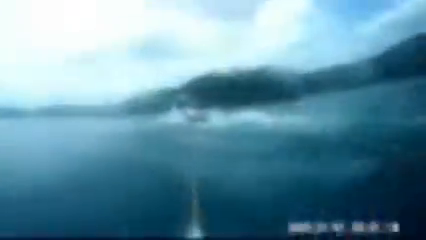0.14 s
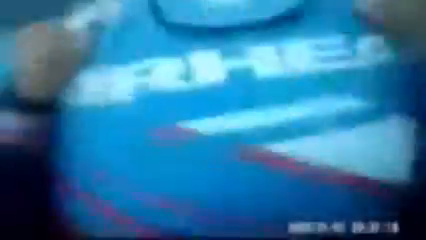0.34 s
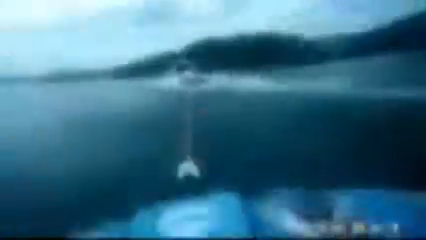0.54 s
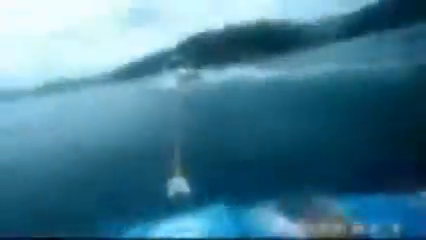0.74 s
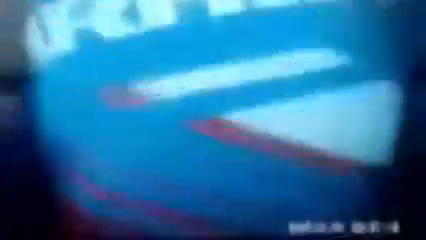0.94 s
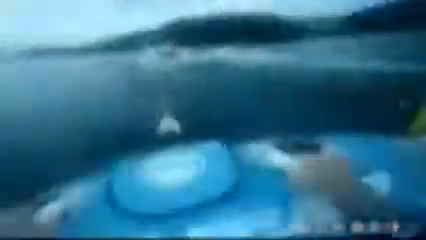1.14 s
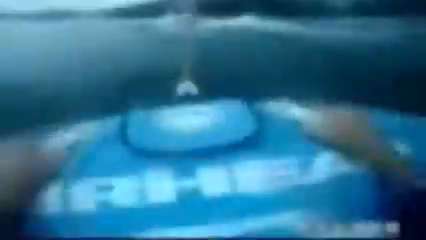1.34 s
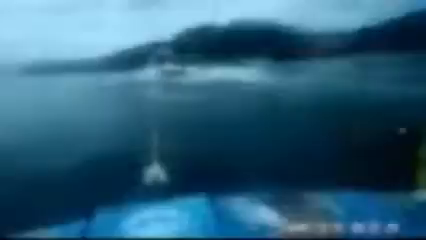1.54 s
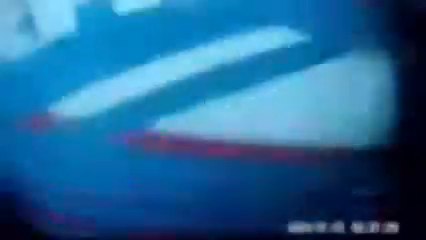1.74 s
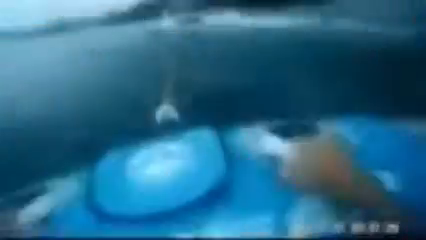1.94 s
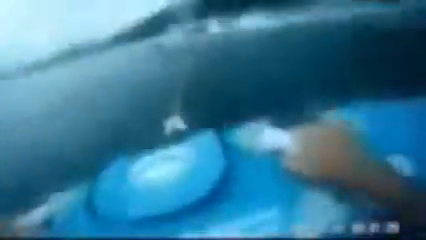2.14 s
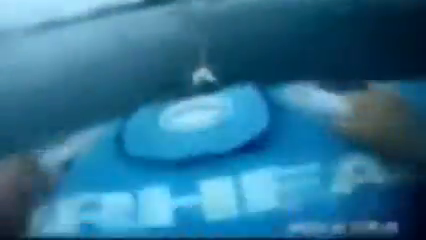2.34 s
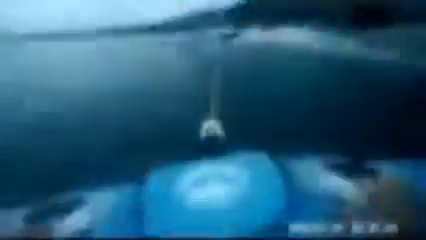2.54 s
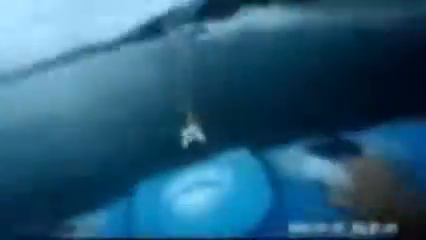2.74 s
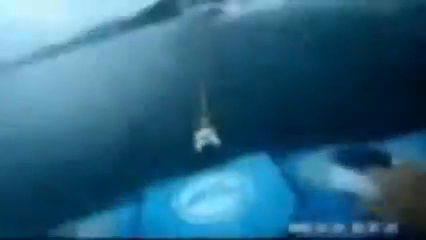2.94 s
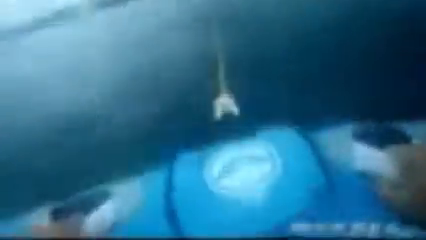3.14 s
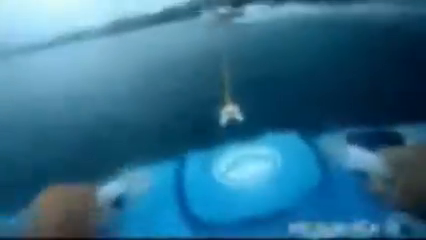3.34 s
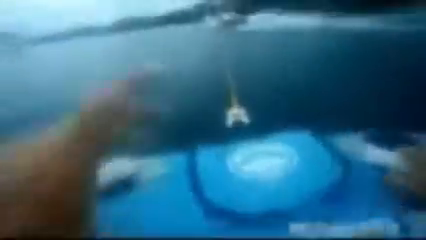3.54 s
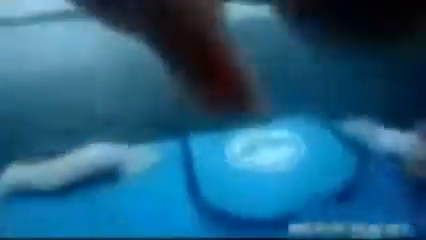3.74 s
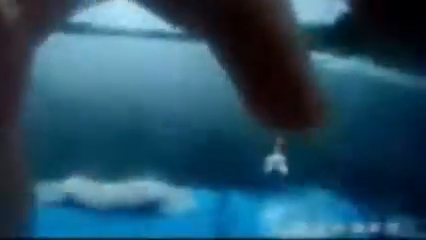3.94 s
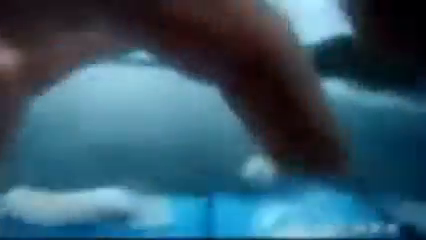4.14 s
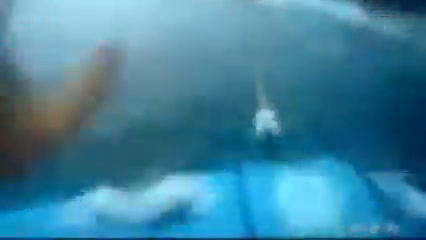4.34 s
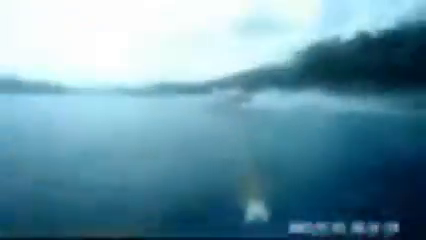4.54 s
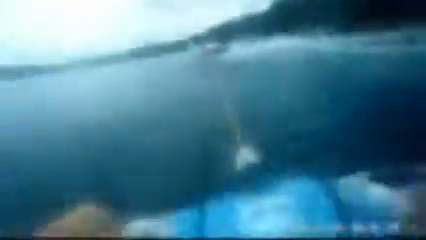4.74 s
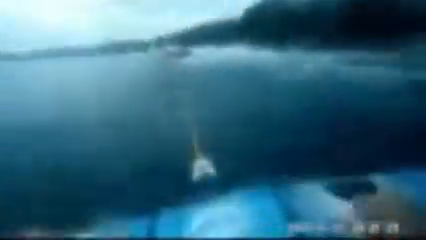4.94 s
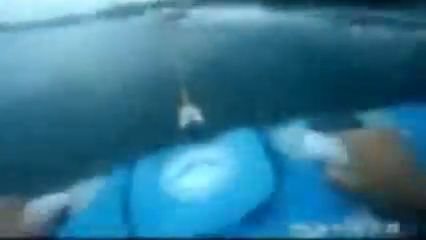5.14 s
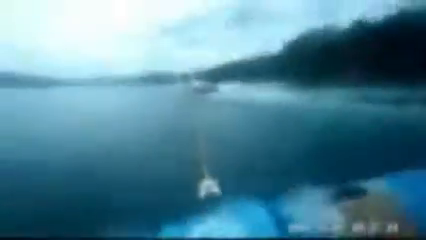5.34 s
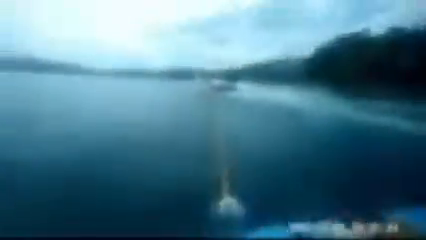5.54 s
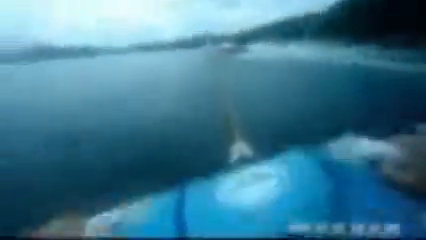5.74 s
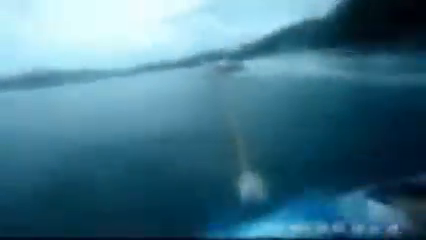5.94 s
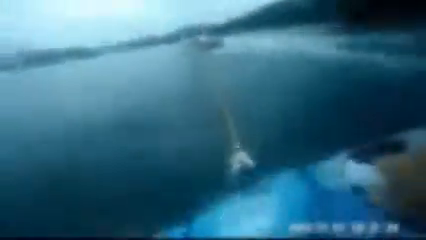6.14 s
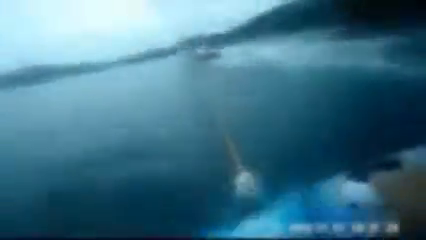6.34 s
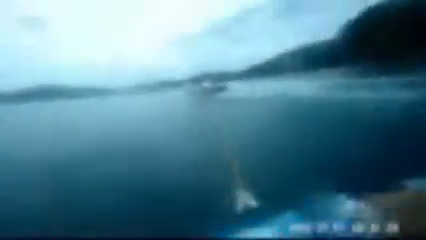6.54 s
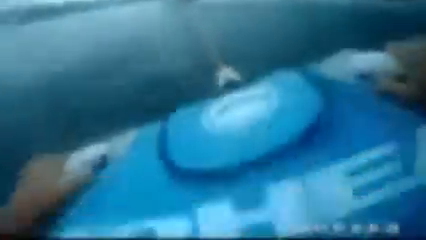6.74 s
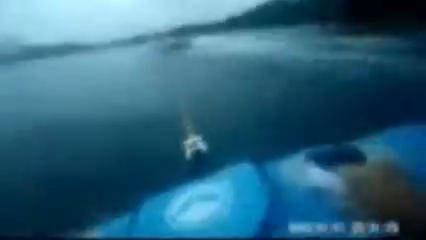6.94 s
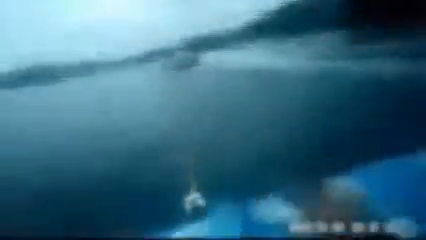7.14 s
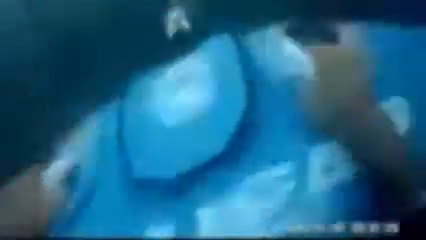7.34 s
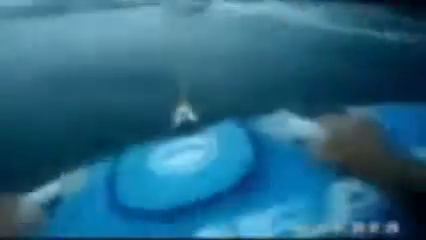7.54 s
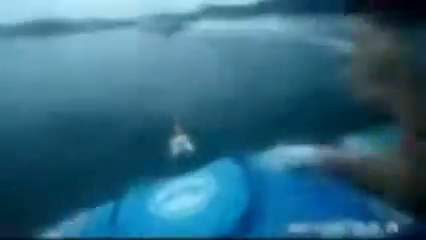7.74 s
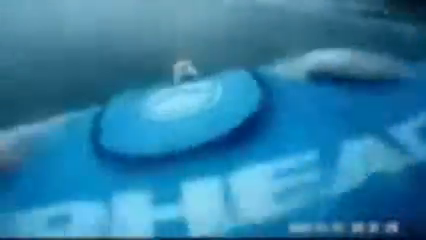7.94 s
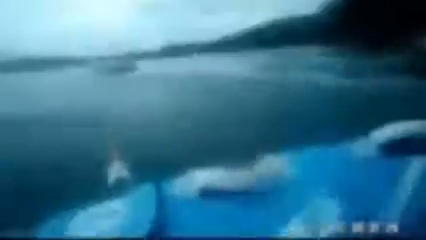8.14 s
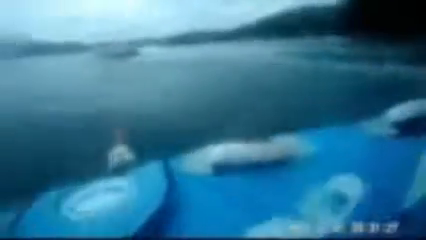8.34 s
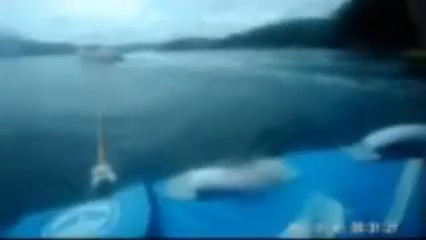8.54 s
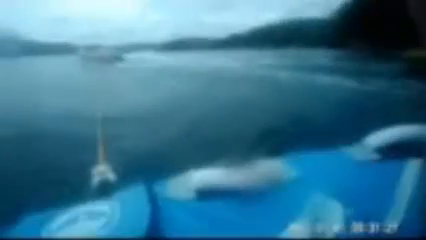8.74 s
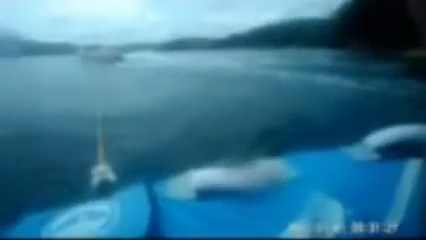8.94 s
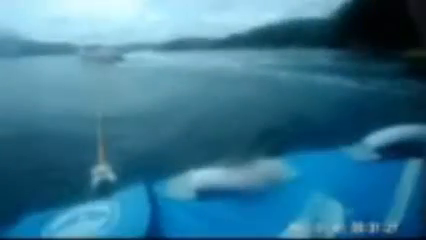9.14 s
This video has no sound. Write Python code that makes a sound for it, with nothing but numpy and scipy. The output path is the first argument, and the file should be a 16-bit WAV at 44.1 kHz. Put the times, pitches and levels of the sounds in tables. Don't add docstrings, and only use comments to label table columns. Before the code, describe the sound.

Inside a plastic housing on a towed tube, violent water blows, clacks and brief squeaks break over a muffled rushing hum, then abruptly stop.

```python
import sys
import numpy as np
from scipy import signal
from scipy.fft import rfft, irfft, next_fast_len
from scipy.io import wavfile
from scipy.ndimage import uniform_filter1d, minimum_filter1d, map_coordinates

SR = 44100
rng = np.random.default_rng(int(sys.argv[2]) if len(sys.argv) > 2 else 0)


def put_to_file(sound):
    columns = np.atleast_2d(sound).T
    safe = np.clip(columns, -1, 1)
    whole_steps = np.round(safe * 32767)
    wavfile.write(sys.argv[1], SR, whole_steps.astype(np.int16))


def makeup_ratio(level_db):
    decades = np.asarray(level_db, float) / 20
    return 10 ** decades


N = 405279


def unit(x):
    return x / np.sqrt(np.mean(x ** 2) + 1e-20)


def peaked(rows):
    return rows / np.abs(rows).max(axis=1, keepdims=True)


def along(points, hz):
    f, db = np.transpose(points)
    return makeup_ratio(np.interp(np.log(hz + 1), np.log(f + 1), db))


def wobble(rate):
    knots = rng.standard_normal(int(N * rate / SR) + 4)
    return map_coordinates(knots, [np.arange(N) * rate / SR])


def filtered(x, response):
    m = next_fast_len(x.shape[-1] + 8192)
    spectrum = rfft(x, m) * response(np.fft.rfftfreq(m, 1 / SR))
    return irfft(spectrum, m)[..., :x.shape[-1]]


def rush(response, patchy_db):
    z = signal.stft(rng.standard_normal(N), nperseg=512)[2]
    patches = uniform_filter1d(rng.standard_normal(z.shape), 6, 0)
    patches = unit(uniform_filter1d(patches, 10, 1))
    noise = signal.istft(z * makeup_ratio(patchy_db * patches), nperseg=512)[1][:N]
    return unit(filtered(noise, response))


def placed(times, rows):
    at = np.round(times * SR).astype(int)[:, None] + np.arange(rows.shape[1])
    return np.bincount(at.ravel(), rows.ravel(), N + SR)[:N]


def sheet_power(table, edge_s):
    t = np.arange(N) / SR
    power = 0
    for s, length, db in table:
        rise, drain = np.tanh((t - s) / edge_s), np.tanh((t - s - length) / edge_s)
        power = power + makeup_ratio(2 * db) * (rise - drain) / 2
    return np.abs(power)


def slams():
    # trough in s, depth in dB, width in ms, push before it (relative).
    waves = [(0.2841, 4.3, 7.2, 0.88), (0.332, 0.3, 8.4, 0.44), (0.7189, -23.7, 5.6, 1.76),
             (0.8573, 5.1, 7.2, 0.69), (0.9033, 2.0, 8.5, 0.51), (1.1076, 2.5, 8.2, 0.39),
             (1.1462, -7.2, 4.6, 0.03), (1.3234, 5.9, 8.7, 0.54), (1.3724, -7.3, 9.8, 0.25),
             (1.5597, -21.8, 7.8, 2.49), (1.6706, 6.4, 8.1, 0.61), (1.7206, -4.4, 8.7, 0.35),
             (2.1084, 1.9, 7.9, 0.2), (2.141, -0.7, 2.1, 0.18), (2.3493, 3.7, 7.8, 0.32),
             (2.3811, -6.7, 3.5, 0.22), (3.4531, -9.1, 5.3, 0.56), (3.4815, -7.0, 9.9, 0.53),
             (3.9825, -17.6, 5.1, 0.13), (4.009, -21.8, 7.3, 2.48), (4.028, -11.3, 6.2, 0.14),
             (4.0711, -11.0, 9.6, 0.01), (4.2037, -11.2, 10.5, 0.24), (5.0385, -8.2, 8.9, 0.26),
             (5.7493, -11.0, 9.6, 0.18), (7.2154, 2.1, 8.1, 0.31), (7.2707, -7.9, 3.7, 0.03),
             (7.7016, -29.3, 10.4, 1.27), (7.7807, -15.8, 6.6, 0.0), (7.9288, -19.6, 4.4, 0.16),
             (7.9519, -12.5, 7.1, 0.54)]
    # trough in s, depth in dB.
    heaves = [(.15, -28), (.547, -22), (.941, -23), (1.225, -24), (2.55, -24), (2.773, -18), (2.995, -31),
              (3.479, -13), (3.498, -15), (3.66, -22), (3.836, -29), (3.91, -28), (4.629, -25), (6, -30),
              (6.184, -20), (6.975, -22), (7.732, -23), (7.823, -25), (8.049, -28), (8.224, -24)]
    heave_late_s, heave_ms, heave_push = .002, 13, .25
    slow = [(s + heave_late_s, db, heave_ms, heave_push) for s, db in heaves]
    s, db, ms, push = np.array(list(waves) + slow).T[:, :, None]
    lead_s = .03
    t = np.arange(4000) / SR - lead_s
    u = t / (ms / 2400)
    swell = 1.3 * push * np.exp(-.5 * ((u + 1.82) / .66) ** 2)
    suck = np.exp(-np.abs(u / np.where(u < 0, 1.47, 1.06)) ** 2.1)
    dip = makeup_ratio(db) * (swell - suck)
    rebound_width_s = np.where(t < .0265, .007, .003)
    rebound = -makeup_ratio(np.minimum(db, -10) - 10) * np.exp(-.5 * ((t - .0265) / rebound_width_s) ** 2)

    def leak(f):
        return 1j * f * (1j * f + 30) / (36 ** 2 - f * f + 82j * f)
    return makeup_ratio(5.6) * filtered(placed(s[:, 0] - lead_s, dip + rebound), leak)


def squeaks():
    # time in s, peak in dB, length in ms.
    whistles = [(0.277, -17, 1.3), (0.293, -9, 1.5), (.328, -19.5, 1.5), (0.8519, -5.5, 1.3),
                (0.898, -18.5, 1.5), (1.102, -6.5, 1.3), (1.3177, -7, 0.89), (1.368, -18.5, 1),
                (1.665, -14.5, 1.5), (1.717, -34.5, 1.3), (2.104, 0, 1.1), (2.3435, -1.5, 0.89),
                (3.432, -15.5, 2.5), (3.46, -2.5, 1.045), (3.475, -22.5, 1.3), (3.996, -34.5, 5.5),
                (4.054, -21.5, 0.85), (4.067, -28, 1.3), (7.212, -10, 1.5), (7.666, -15, 1.2),
                (7.672, -24.5, 1.2), (8.095, -4.5, 0.69)]
    centre_hz, width_hz = 4230, 2300
    s, db, ms = np.array(whistles).T[:, :, None]
    t = np.arange(1000) / SR - .011

    def band(f):
        return (1j * f * width_hz / (centre_hz ** 2 - f * f + 1j * f * width_hz)) ** 2
    swell = np.exp(-.5 * (1000 * t / np.clip(ms, .5, 4)) ** 2)
    rows = swell * filtered(rng.standard_normal((len(s), len(t))), band)
    return placed(s[:, 0] + t[0], makeup_ratio(db) * peaked(rows))


def blows():
    # time in s, ring in dB, crack in dB, loss to all parts, lid included, in dB.
    on_lid = [(.0722, -1.5, -6.5, 4.5), (.7408, -13, -7, -6.5), (.826, 9.5, 1.5, 14.5),
              (1.0978, -7.5, -28, 2.5), (1.1078, -6, -6, 2.5), (1.146, 8, 12, 1), (1.3284, 7, 1.5, 2.5),
              (2.148, -10, -17.5, 3), (2.3808, 8.5, 7.5, 4.5), (3.4186, -11, -1.5, 14.5),
              (3.5644, -30, -30.5, -2), (3.7108, -23, -37, 3.5), (3.8975, -28.5, -37, -4),
              (4.2554, -24, -45, 3.5), (7.0422, -9.5, -17, -2), (7.2704, 6.5, -1, 5.5),
              (7.687, -20.5, -37, 7.5), (7.986, -19, -60, 28.5), (7.999, -13, -61, 28)]
    # time in s, ring in dB, crack in dB, loss to other parts in dB.
    on_shell = [(.2665, -8, -45, 16), (.2852, 1, 4, 4), (.3318, -5.5, -6.5, 5), (.8306, -2.5, -20.5, 5),
                (.8585, 0.5, -0.5, 14), (.9036, -6.5, -6, 7), (1.3005, -15, -43, 10),
                (1.3104, -6, -29.5, 8), (1.316, -10.5, -19, 8), (1.4145, -19.5, -26.5, 6),
                (1.6165, 0, 0, 14), (1.6418, -13.5, -42, 6.4), (1.665, -10.5, -30, 13),
                (1.6715, -0.5, 2, 8.4), (1.7185, -25, -40, 10), (2.1025, -10, -20, 12),
                (2.1203, -5, -17.5, 3), (2.1425, 12.5, 16.5, 10), (2.343, -8.5, -18.5, 14),
                (2.3505, -17, -20.5, 14), (3.4145, -3, -20.5, 4.2), (3.4362, -0.5, 2.5, 6),
                (3.443, -4, -19, 16), (3.4585, -14, -8.5, 13), (3.4668, -9, -10, 4), (4.0148, -26, -24, 8),
                (4.0503, -17, -24, 14), (4.0722, -12, -19.5, 10), (6.8465, -28.5, -44, 1),
                (7.2105, -22, -31.5, 14), (7.2165, -20.5, -20.5, 10), (7.4495, -32, -67, 30),
                (7.8935, -24.5, -41, 12), (7.9052, -11.5, -16.5, 12), (7.9381, -21, -29, 17),
                (7.9462, -11, -15.5, 8), (8.099, -15, -25.5, 6)]
    # time in s, ring in dB, crack in dB, loss to other parts in dB.
    on_mount = [(.3775, -40.5, -55, 11.5), (.7104, -28.5, -47, 2.5), (.8158, -20, -40, 0.5),
                (.8635, -12, -32.5, 17.5), (1.1235, -21.5, -45.5, 5.5), (1.3243, -9.5, -18, -1),
                (1.4071, -19, -51.5, 22.5), (1.5488, -13.5, -7, -2.5), (1.571, -29, -49, 8.5),
                (1.5795, -23, -45.5, 6), (1.6312, -10.5, -12.5, 4), (1.7705, -20, -50, -1),
                (2.0762, -25, -40, 9.5), (2.0985, -14, -37, 9.5), (2.3158, -20, -48, -1.5),
                (2.3405, -15, -31, 16), (2.9327, -37, -50.5, 5.5), (3.4518, -12.5, -12, 9),
                (3.522, -34, -48, 5), (3.9805, -36.5, -42, 9), (4.0005, -26.5, -39.5, 2),
                (4.0765, -25.5, -35, 6), (4.0948, -28.5, -44, -2), (4.1803, -30, -45, 8.5),
                (4.994, -39, -60, 20), (5, -32.5, -60, 20), (5.0165, -34, -60, 17), (5.023, -35.5, -60, 20),
                (5.031, -32.5, -50, 2), (5.7075, -32.5, -60, 16.5), (5.7135, -29, -60, 16),
                (5.7265, -37, -60, 16), (5.739, -34.5, -37, 1.5), (6.172, -38.5, -60, 12.5),
                (6.143, -34, -48, 9.5), (7.0872, -20, -70, 14), (7.1871, -20, -31, 0),
                (7.2062, -12.5, -31.5, 0), (7.6615, -12.5, -18.5, -2), (7.6825, -23, -50.5, 8.5),
                (7.775, -43.5, -50, 10.5), (7.8377, -28, -25.5, 9), (7.865, -32.5, -55, 17),
                (8.0222, -24.5, -46.5, 9.5)]
    # time in s, ring, crack and loss in dB.
    scrapes = [(.289, -12, -8, 7.3), (.85, -19, -29, 4), (.868, -21, -40.5, 6), (1.0758, -15.5, -51, 10),
               (1.084, -28.5, -49.5, 8), (1.634, -12, -35, 5.5), (1.678, -15.5, -36, 8),
               (2.1085, -11, -12.5, 4), (3.4225, -14, -10.5, 10), (3.4275, -14, -11.5, 12),
               (3.4465, -9, -18.5, 10), (3.471, -25, -19, 11), (3.6202, -28, -40, 14.7),
               (3.985, -25, -29, 6.7), (4.026, -30.5, -27.5, 6), (8.091, -33.5, -11, 22),
               (8.1218, -24.5, -30, 2)]
    mount, shell = 0, 2
    # contacts, coupling in dB to (mount, lid, shell), parts without loss, contact in ms
    kinds = [(on_lid, (-12, 0, 0.11), [], 2.05),
             (on_shell, (-3, 0.5, 0), [shell], 2.94),
             (on_mount, (0, -1, .1), [mount], 2.2),
             (scrapes, (-6, 0.092, 0), [mount, shell], 8)]
    rows = []
    for table, coupling, struck, ms in kinds:
        for s, ring, crack, lost in table:
            parts = [ring + c - lost * (part not in struck) for part, c in enumerate(coupling)]
            rows.append((s, crack, *parts, ms))
    return np.array(sorted(rows))


def knocks():
    # frequency in Hz, level in dB per Hz.
    crack_colour = [(800, -23), (2000, 1.5), (4500, 0), (7000, -11.5), (8600, -12), (11000, -14),
                    (16000, -57.5)]
    # part that drives it (0 mount, 1 lid, 2 shell), frequency in Hz,
    # level in dB, t60 in s, pitch scatter from blow to blow (fraction).
    resonances = [(0, 339.4, 10.5, 0.017, 0.1), (0, 465, 3.5, 0.033, 0.15), (1, 718.6, -0.5, 0.056, 0.0019),
                  (1, 606, 2.5, 0.015, 0.18), (2, 1003, 0, 0.007, 0.2), (2, 1420, 1.5, 0.0075, 0.028),
                  (2, 1724, -12.5, 0.021, 0.082), (2, 2387, -18, 0.0056, 0.055)]
    s, crack_db, *part_db, ms = blows().T[:, :, None]
    t = np.arange(3000) / SR
    contact = np.exp(-(t / (ms / 650)) ** 2) * (1 - np.exp(-t / 0.00056))
    crack = filtered(rng.standard_normal((len(s), len(t))), lambda f: along(crack_colour, f))
    rows = makeup_ratio(crack_db - 2.5) * peaked(contact * crack)
    kick = 0.56 * np.sqrt(ms * SR / 1000) * (t == 0)
    for part, hz, db, t60, scatter in resonances:
        pitch_hz = hz * (1 + scatter * np.tanh(rng.standard_normal(s.shape)))
        ring = np.cos(2 * np.pi * pitch_hz * t) * makeup_ratio(-60 * t / t60)
        force = contact * rng.standard_normal(rows.shape) + kick
        force = filtered(force, lambda f: (1 + 1j * f / (1.5 * hz)) ** -3)
        rung = signal.fftconvolve(force, ring, axes=1)[:, :len(t)]
        rows += makeup_ratio(part_db[round(part)] + db) * peaked(rung)
    return placed(s[:, 0], rows)


def swishes():
    # start in s, length in s, level in dB.
    drags = [(.266, .013, -26), (.296, .02, -32.5), (.834, 0.023, -23), (.866, .025, -31.5),
             (1.076, 0.026, -45), (1.113, .02, -36), (1.299, 0.015, -30.5), (1.62, 0.04, -27),
             (1.677, 0.016, -35.5), (2.078, .02, -36.5), (2.316, .024, -34.5), (3.416, .055, -27),
             (3.61, .08, -40), (3.98, 0.052, -38), (4.4, 0.16, -47.5), (6.54, .1, -38.5),
             (6.945, 0.043, -41), (7.452, .02, -41), (7.67, .05, -40.5), (7.952, .035, -36),
             (8.13, .04, -44.5)]
    # frequency in Hz, level in dB per Hz.
    colour = [(300, -28.5), (900, -0.5), (1500, 2.5), (2400, -7.5), (3200, -17.5), (5000, -38.5)]
    grain_db, grains_per_s = 6, 350
    grains = makeup_ratio(grain_db * wobble(grains_per_s)) * rush(lambda f: along(colour, f), patchy_db=4.5)
    return np.sqrt(sheet_power(drags, edge_s=.003)) * unit(grains)


def water():
    # time in s, buffeting in dB, rush in the case in dB.
    ride = [(0.0, -34.5, -27.5), (0.29, -32, -33.5), (0.61, -39.5, -31.5), (1.28, -29.5, -32.5),
            (1.4, -39.5, -32.5), (2.03, -40, -33.5), (3.36, -50.5, -34), (3.61, -32.5, -35),
            (4.01, -36.5, -32), (4.33, -39, -33), (5.05, -50, -35), (5.48, -52, -35), (6.34, -44.5, -35.5),
            (6.88, -47, -33.5), (7.11, -36, -34), (7.51, -48, -36.5), (7.92, -38.5, -31.5),
            (8.1, -38, -33.5)]
    # frequency in Hz, width in Hz, level in dB.
    hum = [(155, 30, -3), (300, 60, -1), (743, 28, 1), (1345, 160, -2), (1750, 200, -13)]
    # frequency in Hz, level in dB per Hz.
    base = [(60, -27.5), (120, -6.5), (400, -7.5), (1000, -10), (2000, -22.5), (3000, -36), (5000, -76.5)]
    # frequency in Hz, level in dB per Hz.
    spray = [(1180, -43.5), (2000, -7), (2930, -9), (4230, -10), (4700, -12.5), (5380, -6), (7150, -18.5),
             (9370, -23.5), (10400, -20.5), (11000, -22.5), (12000, -43.5), (15600, -80.5), (22000, -120)]
    # frequency in Hz, level in dB per Hz.
    buffet = [(12, -24), (30, -8), (70, -13.5), (130, -11.5), (300, -79)]
    # start in s, length in s, hiss in dB.
    sheet_rows = [(0.275, 0.0327, -28.5), (1.083, 0.045, -41.5), (3.527, 0.2, -45), (3.598, 0.1, -39.5),
                  (3.748, .05, -46), (3.786, 0.16, -43), (3.97, .05, -50.5), (4.033, .06, -43),
                  (4.4, 0.11, -49), (6.55, 0.092, -46.5), (7.661, 0.068, -42), (7.774, 0.097, -48),
                  (7.934, 0.035, -38), (8.101, 0.072, -46.5), (8.257, .1, -67.5)]
    spray_under_db = -17
    sheet_rush_db = 9.5
    s, buffet_points, rush_points = np.transpose(ride)
    t = np.arange(N) / SR
    buffet_db, rush_db = np.interp(t, s, buffet_points), np.interp(t, s, rush_points)

    def shell(f):
        rings = sum(makeup_ratio(db) * np.abs(f * w / (c * c - f * f + 1j * f * w)) ** 2 for c, w, db in hum)
        return along(base, f) + rings
    shake = wobble(6.9)
    sheets = sheet_power(sheet_rows, edge_s=0.0063)

    body = np.sqrt(makeup_ratio(2 * rush_db) + makeup_ratio(2 * sheet_rush_db) * sheets)
    body = body * makeup_ratio(0.4 * shake + 0.65 * wobble(40)) * rush(shell, patchy_db=1.7)
    hiss = np.sqrt(makeup_ratio(2 * (rush_db + spray_under_db)) + sheets)
    hiss = hiss * makeup_ratio(.45 * shake + .6 * wobble(30)) * rush(lambda f: along(spray, f), patchy_db=.9)
    buffeting = unit(makeup_ratio(3.5 * wobble(10)) * rush(lambda f: along(buffet, f), patchy_db=3))
    return body + hiss + makeup_ratio(buffet_db) * buffeting


def scene():
    return (slams() + squeaks() + knocks() + swishes() + water())[None]


def top_cut(x):
    return signal.sosfilt(signal.butter(12, 16120, fs=SR, output="sos"), x)


def record(dry):
    # from Hz, to Hz, how rarely it drops out (threshold).
    shed_bands = [(8900, 9150, 1.2), (9500, 9750, 1), (10000, 10250, 1.2), (10900, 11250, .5),
                  (11250, 11600, -.2)]
    # frequency in Hz, level in dB per Hz.
    grit = [(100, -28.5), (500, -6.5), (1500, 6.5), (3000, -36.5), (6000, -25), (11000, -33),
            (11500, -88.5)]
    # start in s, end in s.
    bright = [(.262, .35), (3.433, 3.5), (3.95, 4.02), (4.055, 4.25), (7.68, 7.8), (8.105, 8.15)]
    stop_s = 8.331
    t = np.arange(N) / SR

    rise, fall = np.exp(-1 / (0.0091 * SR)), np.exp(-1 / (.06 * SR))
    poles = np.convolve([1, -rise], [1, -fall])
    load = signal.lfilter([(1 - rise) * (1 - fall)], poles, np.minimum(dry ** 2, 1))
    x = dry / (1 + load / 0.33) ** 1.4
    x = x / (1 + np.abs(x / .93) ** 8) ** (1 / 8)
    x = filtered(x, lambda f: 1j * f / (2.5 + 1j * f) * (f < 11600))

    for low, high, rare in shed_bands:
        flutter = uniform_filter1d(1. * (wobble(30) > rare), size=500)
        x = x - flutter * filtered(x, lambda f: (f > low) & (f <= high))

    blow_power = filtered(x, lambda f: f > 1200) ** 2 + 0.03 * x ** 2
    smear = np.sqrt(np.abs(uniform_filter1d(blow_power, size=300, origin=30)))
    x = x + makeup_ratio(-8) * smear ** 2 / (smear + .015) * rush(lambda f: along(grit, f), patchy_db=2)

    loud = -minimum_filter1d(-np.abs(x), size=1300) > .45
    spared = sum((t > a) & (t < b) for a, b in bright).astype(bool)
    shed = uniform_filter1d(1. * (loud & ~spared), size=300)
    x = x - shed * filtered(x, lambda f: np.clip((f - 8300) / 700, 0, 1))
    x = np.clip(x, -1, 1) * np.clip((stop_s - t) / .002, 0, 1)
    return top_cut(x)


dry = scene()
out = record(dry)
put_to_file(out)
```